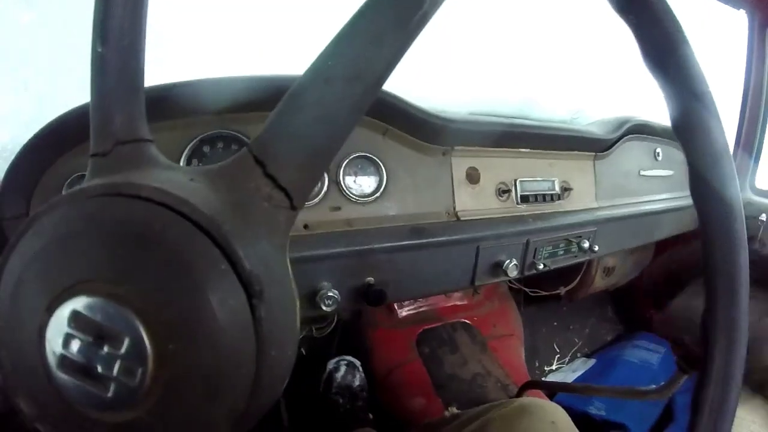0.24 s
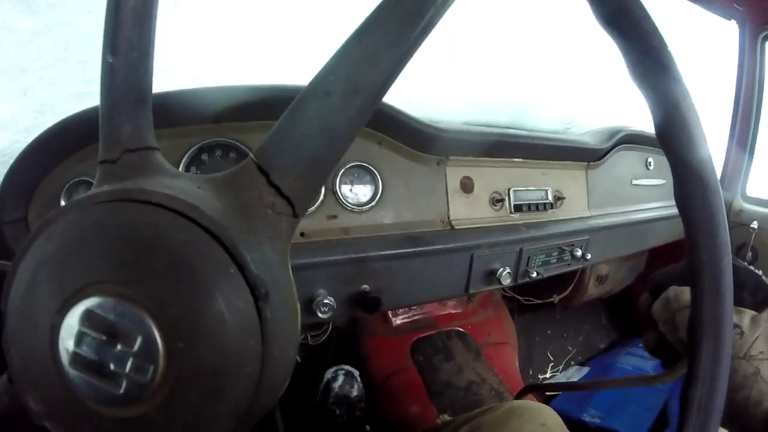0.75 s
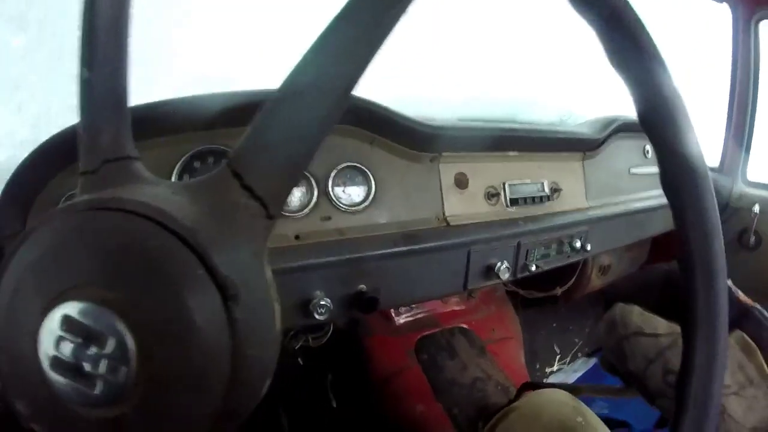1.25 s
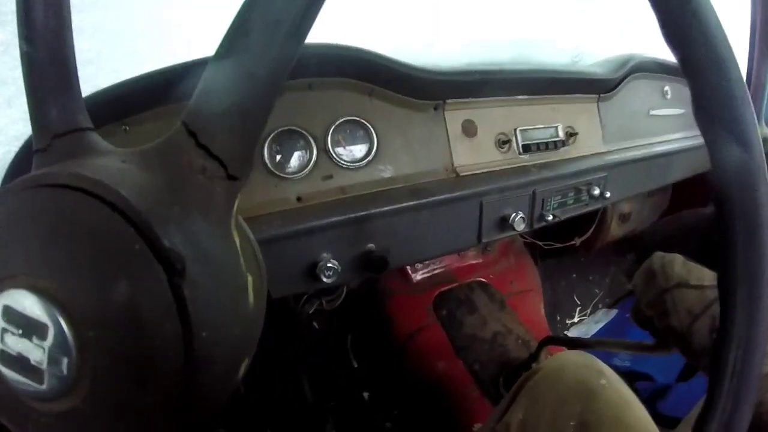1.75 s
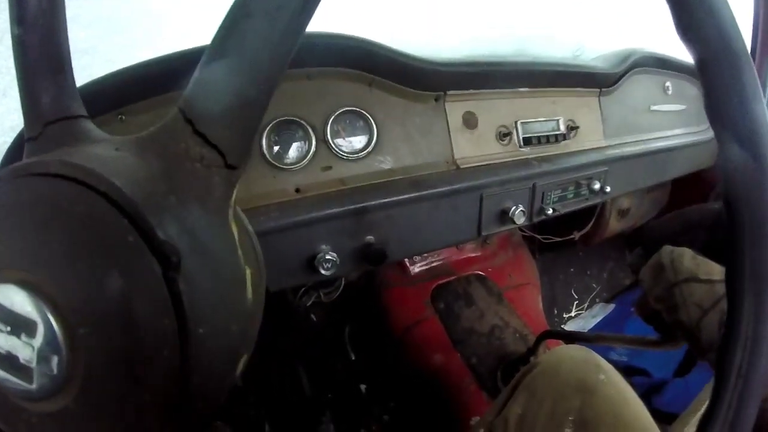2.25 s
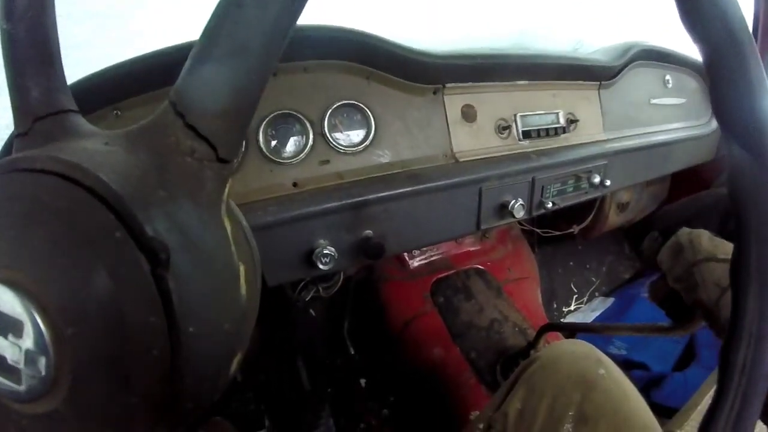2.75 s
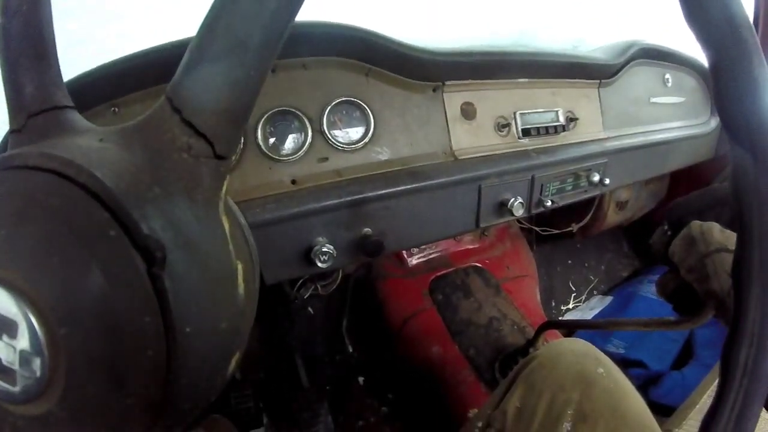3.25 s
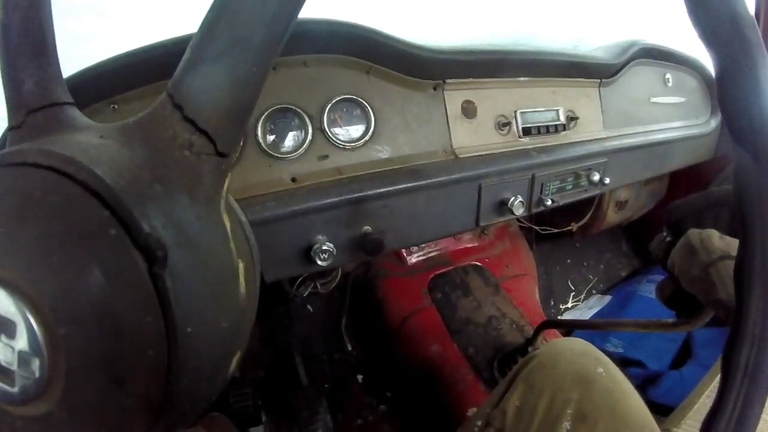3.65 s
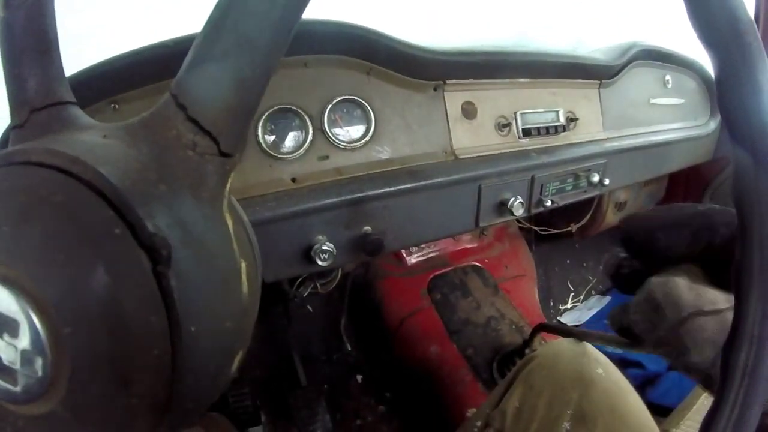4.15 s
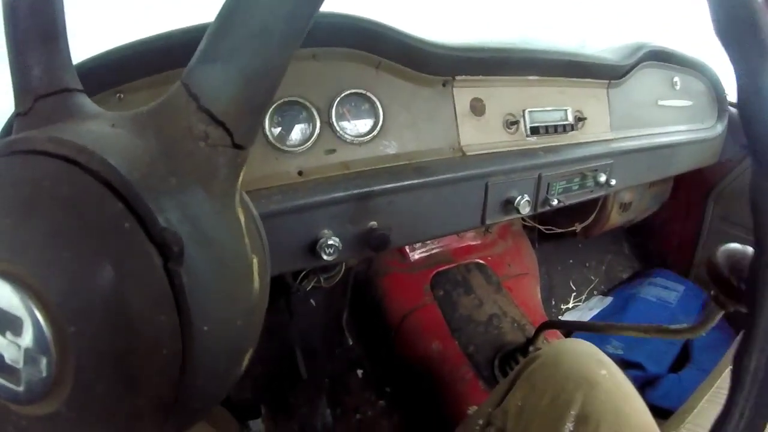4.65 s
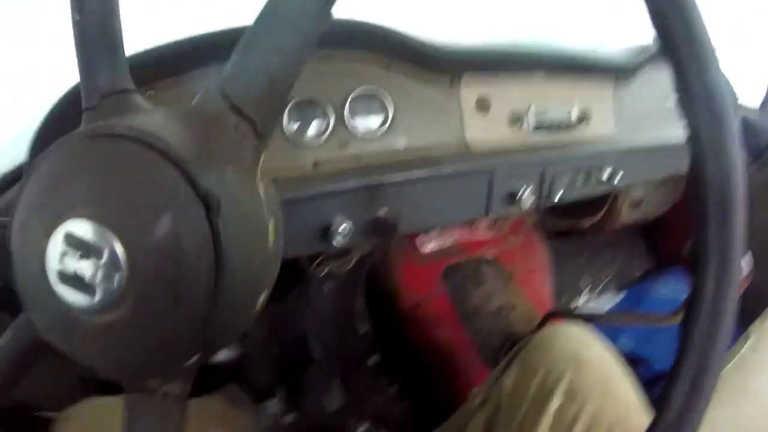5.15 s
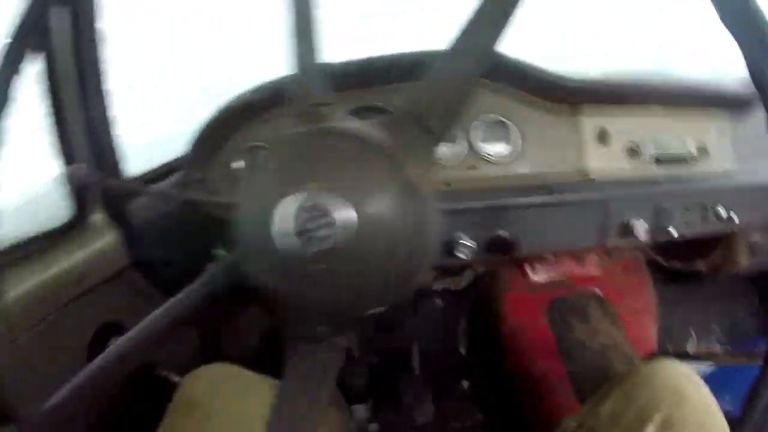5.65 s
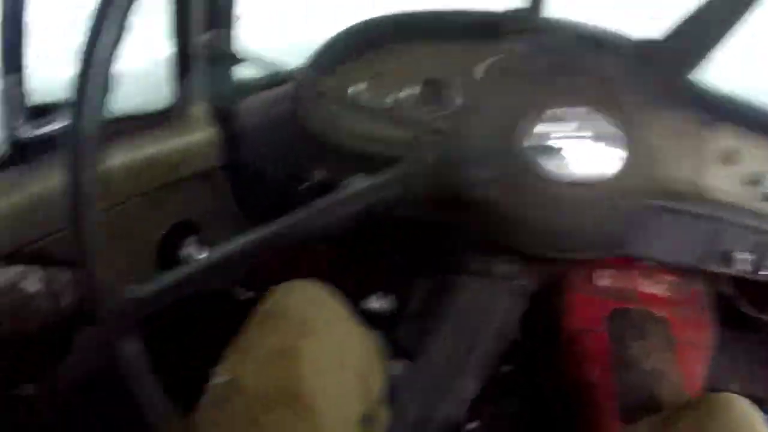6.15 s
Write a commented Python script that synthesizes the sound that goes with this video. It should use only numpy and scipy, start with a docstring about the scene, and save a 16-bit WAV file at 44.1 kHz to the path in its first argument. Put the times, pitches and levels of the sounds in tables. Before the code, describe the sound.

Heard close up in the cab of an old truck, an idling engine booms and shakes the body in a fast, lumpy rhythm. Quiet ticking sits on top, with a small clink early and dull panel knocks through the middle. After about five seconds the low shudder in the microphone lightens, and the driver's movements add a few soft thumps, short rustles and a key-like jingle over the continuing idle.

```python
"""A straight six idles unevenly, heard in the cab of an old pickup: six firings every sixth of a second. They
boom in the exhaust and shake the body; the shake comes up through a hand resting on the gear lever or steering
wheel until it lets go. Valve gear ticks over a fan-like hiss, one tappet pings, panels knock and hum. Then the
driver shifts: scrapes of cloth and trim, creaks, small metal clinks and a jingle, soft bumps."""
import sys
import numpy as np
from scipy import signal
from scipy.fft import rfft, irfft
from scipy.io import wavfile
from scipy.ndimage import uniform_filter1d

SR = 44100
rng = np.random.default_rng(int(sys.argv[2]) if len(sys.argv) > 2 else 0)


def output_pcm(signal):
    """Save a mono or channel-first signal as 16-bit PCM at the path in sys.argv[1].

    Samples are clipped to [-1, 1] before scaling.
    """
    pcm = np.clip(np.atleast_2d(signal).T, -1, 1) * 32767
    wavfile.write(sys.argv[1], SR, np.round(pcm).astype(np.int16))


N = 281799


def undb(db):
    return 10 ** (np.asarray(db) / 20)


def unit(x):
    return x / np.sqrt(np.mean(x ** 2))


def curve(table):
    """Automation: straight lines through (time, value) points."""
    return np.interp(np.arange(N) / SR, *np.transpose(table))


def ring(x, hz, width_hz):
    """Resonance with gain 1 at its centre."""
    return signal.lfilter(*signal.iirpeak(hz, hz / width_hz, SR), x)


def noise_band(hz, width_hz):
    """A resonance kept ringing by noise, rms 1."""
    return unit(ring(rng.standard_normal(N), hz, width_hz))


def coloured(spectrum, white):
    """White noise through an EQ curve, rms 1."""
    hz, db = np.transpose(spectrum)
    bin_hz = np.arange(N // 2 + 1) * SR / N
    gain = undb(np.interp(np.log(bin_hz + 1), np.log(hz), db))
    return unit(irfft(rfft(white) * gain, N))


def wander(rate_hz):
    """Smooth random drift, rms 1."""
    hold = int(SR / rate_hz)
    steps = np.repeat(rng.standard_normal(N // hold + 1), hold)
    return unit(uniform_filter1d(uniform_filter1d(steps, hold), hold)[:N])


# Idle speed, the tempo of the engine: (time [s], cycle rate [Hz])
IDLE_SPEED = [(0, 5.858), (.6, 6.004), (2, 6.003), (2.5, 6.063), (3.3, 6.047), (4, 6.091), (4.6, 6.115),
              (5.5, 6.109), (6.39, 6.149)]
def engine_cycles():
    """Running count of engine cycles."""
    return np.cumsum(curve(IDLE_SPEED)) / SR


def beats(place, scatter_db, jitter):
    """One impulse a cycle, place and jitter in cycles; a 1 s pre-roll gets resonances ringing."""
    hz = curve(IDLE_SPEED)
    cycles = np.cumsum(np.r_[np.full(SR, hz[0]), hz]) / SR - hz[0]
    whole = np.arange(np.ceil(cycles[0]), cycles[-1])
    timing, strength = rng.standard_normal((len(whole), 2)).T
    at = np.searchsorted(cycles, whole + place + jitter * timing)
    out = np.zeros(len(cycles) + 1)
    out[at] = undb(scatter_db * strength)
    return out[:-1]


# Tone of the hiss bed: (frequency [Hz], relative level [dB])
HISS_EQ = [(180, -3), (300, 1.5), (348, -7), (587, 0), (827, -6.5), (1070, -2.5), (1200, -4), (1510, -1),
           (1940, -6.5), (2910, -11), (3660, -10), (4530, -20), (9000, -28), (11900, -35.5), (15000, -76)]
# Its fader: (time [s], level [dB])
HISS_LEVEL = [(0, -53.5), (.55, -57.5), (1.5, -57), (6.39, -55.5)]
def hiss(repeat_share=.25):
    """Fan and intake noise plus dense clatter that repeats each cycle, pulsing a little with the firings."""
    cycles, loop_size = engine_cycles(), SR // 6
    clatter = rng.standard_normal(loop_size)[(cycles % 1 * loop_size).astype(int)]
    white = np.sqrt(repeat_share) * clatter + np.sqrt(1 - repeat_share) * rng.standard_normal(N)
    pulse_db = .29 * np.cos(2 * np.pi * 6 * cycles)
    return coloured(HISS_EQ, white) * undb(curve(HISS_LEVEL) + pulse_db + .33 * wander(13))


# Sheet metal resonances: (frequency [Hz], width [Hz], level [dB])
SHEET_MODES = [(400.2, 7.7, -71), (572, 35, -76.5), (679, 20, -77), (970, 22, -86), (1102, 14, -74),
               (1520, 98, -78), (2116, 32, -88.5), (2860, 28, -86), (5970, 170, -86), (6900, 280, -81)]
def sheet_hum():
    """Thin dash and floor panels hum, kept ringing by random vibration."""
    return sum(undb(db) * noise_band(hz, width) for hz, width, db in SHEET_MODES)


# Thuds: (time [s], pitch [Hz], decay to -60 dB [s], level [dB])
BUMP_HITS = [(5.182, 47.2, 0.11, -7), (5.348, 39.8, 0.054, -12), (5.102, 184, 0.08, -29.5),
             (5.179, 250, 0.061, -26), (5.27, 257, 0.15, -34.5), (5.329, 256, 0.18, -31.5),
             (5.98, 327, 0.13, -34.5), (5.987, 435, 0.085, -37), (6.336, 389, 0.1, -39)]
def bumps(rise_s=.0051):
    """Soft blows on the housing and seat: short damped swings."""
    out = 0
    for s, hz, t60, db in BUMP_HITS:
        age = np.maximum(np.arange(N) / SR - s, 0)
        envelope = (1 - np.exp(-age / rise_s)) * undb(db - 60 * (age / t60) ** .77)
        out += np.sin(2 * np.pi * hz * age) * envelope
    return out


# Creaks: (time [s], pitch [Hz], decay to -60 dB [s], level [dB])
CREAK_NOTES = [(1.35, 1362, 0.12, -46), (1.595, 1345, .04, -45), (1.596, 1030, .04, -43),
               (1.757, 1360, 0.042, -50), (6.276, 1400, 0.05, -42), (6.289, 1464, .12, -44),
               (5.100, 1390, 0.057, -40.5), (5.614, 2030, 0.036, -36), (5.615, 2400, 0.048, -44),
               (5.622, 1334, 0.066, -40), (5.643, 1390, .1, -47)]
def creaks(rise_s=.0015):
    """The trim creaks in short pitched notes: quick attack, plain decay."""
    out = 0
    for s, hz, t60, db in CREAK_NOTES:
        age = np.maximum(np.arange(N) / SR - s, 0)
        envelope = (1 - np.exp(-age / rise_s)) * undb(db - 60 * age / t60)
        out += np.sin(2 * np.pi * hz * age) * envelope
    return out


def stroke(s, length, swell_share, t60):
    """Span and envelope of a gesture: swell for a share of the length, hold, then release."""
    span = slice(int(s * SR), min(N, int((s + length + t60) * SR)))
    age = np.arange(span.stop - span.start) / SR
    swell = np.minimum(age / (swell_share * length), 1)
    return span, swell * undb(-60 * np.maximum(age - length, 0) / t60)


def rattle(modes, events, swell_share, strike_db, bright_above_hz=5000):
    """Loose metal is struck and chatters for a moment; its modes ring out by themselves."""
    chatter = rng.standard_normal(N) * undb(3.5 * wander(400))
    low_drive, bright_drive, out = np.zeros((3, N))
    for s, length, db, bright_db in events:
        span, envelope = stroke(s, length, swell_share, t60=.062)
        blow = chatter[span] * envelope
        blow[0] = undb(strike_db)
        low_drive[span] += undb(db) * blow
        bright_drive[span] += undb(db + bright_db) * blow
    for hz, width, db in modes:
        drive = bright_drive if hz > bright_above_hz else low_drive
        makeup = np.sqrt(SR / (np.pi * width))  # evens out narrow and wide modes
        out += undb(db) * makeup * ring(ring(drive, hz, width), hz, 6 * width)
    return out


# Ring of the small part: (frequency [Hz], width [Hz], gain [dB])
CLINK_MODES = [(2360, 69, -11.5), (2570, 67, -10.5), (3110, 58, -11.5), (3510, 90, -1.5), (3710, 70, -3),
               (3970, 54, -11), (4294, 62, -10.5), (5810, 160, -11.5), (6750, 150, -12), (7080, 98, -11),
               (9450, 340, -18), (10700, 400, -19), (12800, 990, -24)]
# Clinks: (time [s], length [s], level [dB], treble gain [dB])
CLINK_HITS = [(0.218, 0.018, -49.5, -5), (0.898, 0.024, -62, -3), (1.114, .012, -68, -3),
              (6.275, 0.019, -52, -3), (6.327, 0.005, -44, 3)]
def clinks():
    """A small loose metal part clinks with a hard attack."""
    return rattle(CLINK_MODES, CLINK_HITS, swell_share=.081, strike_db=21)


# Ring of the thin metal: (frequency [Hz], width [Hz], gain [dB])
JINGLE_MODES = [(7400, 400, -5), (8180, 70, -4), (8700, 100, -1), (8900, 45, -3), (9090, 35, -3),
                (9650, 300, -8), (10200, 70, -8), (10700, 46, -8), (10820, 46, -6), (11100, 62, -10),
                (11800, 80, -21)]
# Jingles: (time [s], length [s], level [dB], treble gain [dB])
JINGLE_HITS = [(5.303, 0.032, -67.5, 0), (5.925, 0.026, -65, 0), (5.958, 0.03, -49, 0)]
def jingle():
    """Thin metal, perhaps keys, shimmers with a softer attack."""
    return rattle(JINGLE_MODES, JINGLE_HITS, swell_share=.39, strike_db=7)


# Ring of the trim: (frequency [Hz], width [Hz], gain [dB])
TRIM_MODES = [(1152, 190, -9.5), (1404, 316, 0), (1782, 105, -4), (1990, 295, -4), (2360, 250, -7),
              (2684, 154, -5.5), (3340, 320, -7), (3545, 310, -3.5), (3870, 830, -4.5), (4670, 270, -12),
              (5160, 260, -9.5), (5720, 280, -7), (6780, 170, -12), (7600, 760, -16), (8500, 380, -16),
              (10300, 720, -16), (12200, 990, -11.5), (14400, 550, -13)]
# Scrapes: (time [s], length [s], dull centre [Hz], dull level [dB], bright level [dB], airy level [dB])
SCRAPE_STROKES = [(0.84, 0.13, 1400, -55, -69.5, -72), (1.582, 0.016, 1300, -52.5, -68, -72),
                  (5.098, .008, 1500, -47.5, -63, -64), (5.107, 0.044, 1700, -41.5, -56.5, -57),
                  (5.159, 0.029, 1530, -50, -65, -73), (5.184, 0.09, 1570, -47, -62.5, -76),
                  (5.269, 0.021, 1190, -41.5, -63, -66), (5.28, 0.039, 2840, -44, -72, -72),
                  (5.294, 0.041, 1330, -42.5, -54, -54), (5.488, 0.019, 1500, -60, -64.5, -66),
                  (5.611, 0.012, 1780, -49, -60, -69), (5.633, 0.027, 1400, -52, -69, -76),
                  (5.919, 0.0073, 2000, -57, -60, -53), (5.923, 0.034, 1940, -47, -57.5, -56),
                  (5.968, 0.025, 2800, -39, -55.5, -55.5), (5.975, 0.022, 1640, -40, -60, -60),
                  (5.995, 0.029, 1390, -61, -57.5, -62), (6.273, 0.014, 1500, -48, -55, -65),
                  (6.285, 0.033, 1520, -51.5, -60, -60), (6.326, 0.0085, 1510, -46.5, -45, -51),
                  (6.344, .01, 1810, -51, -57, -55)]
def scrapes(dull_top_hz=3100, bright_top_hz=8000):
    """Cloth and hands rub the trim; gritty friction rings its dull, bright and airy modes."""
    grit = rng.standard_normal(N) * undb(1.5 * wander(250))
    modes = np.array([undb(db) * unit(ring(ring(grit, hz, width), hz, 2.5 * width))
                      for hz, width, db in TRIM_MODES])
    hz, out = np.transpose(TRIM_MODES)[0], np.zeros(N)
    for s, length, dull_hz, dull_db, bright_db, airy_db in SCRAPE_STROKES:
        bell_db = dull_db - 34 * np.log2(hz / dull_hz) ** 2  # 34 dB down an octave off centre
        mode_db = np.select([hz < dull_top_hz, hz < bright_top_hz], [bell_db, bright_db], airy_db)
        span, envelope = stroke(s, length, swell_share=.37, t60=.095)
        out[span] += undb(mode_db) @ modes[:, span] * envelope
    return out


# Tone of the rumble: (frequency [Hz], relative level [dB])
RUMBLE_EQ = [(6, -17), (18, -10), (30, -12), (42, -13), (68, -11), (82, -9), (96, -24), (125, -17),
             (160, -17), (190, -17), (245, -20), (290, -30), (600, -60)]
# Its fader: (time [s], level [dB])
RUMBLE_LEVEL = [(0, -50), (.8, -48.5), (1.3, -46), (2, -47.5), (4.74, -47.5), (4.82, -52), (5.1, -49),
                (5.25, -40), (5.45, -51), (6.39, -51)]
def hand_rumble():
    """Loose, wavering rumble in the hand."""
    return coloured(RUMBLE_EQ, rng.standard_normal(N)) * undb(curve(RUMBLE_LEVEL) + .83 * wander(6.8))


# Knocks: (time [s], peak level [dB], pitch [Hz])
PANEL_KNOCKS = [(1.527, -43.5, 252), (1.691, -46.5, 230), (1.951, -44, 226), (2.026, -41, 237),
                (2.194, -43, 245), (2.271, -48, 230), (2.364, -44.5, 232), (2.452, -41.5, 238),
                (2.53, -42, 225), (2.694, -39, 225), (2.858, -43.5, 250), (2.933, -50, 252),
                (3.025, -37.5, 242), (3.19, -38, 236), (3.364, -45, 233), (3.506, -40, 247),
                (3.694, -43.5, 243), (4.015, -46, 235), (4.19, -45.5, 234), (4.344, -42, 240),
                (4.509, -44.5, 220), (4.67, -40, 220)]
def loose_panel(rise_s=.0015, t60=.11):
    """A shaken panel knocks, rings briefly and hums on between knocks."""
    knocks = np.zeros(N)
    age = np.arange(SR // 4) / SR
    for s, db, hz in PANEL_KNOCKS:
        swing = np.sin(2 * np.pi * hz * age) * (1 - np.exp(-age / rise_s)) * undb(-60 * age / t60)
        start = int(s * SR)
        knocks[start:start + len(age)] += undb(db) * swing / swing.max()
    mean_swing = uniform_filter1d(np.abs(knocks), size=SR // 3)
    return knocks + undb(-1) * mean_swing * noise_band(238, width_hz=36)


# Ring of the tappet: (frequency [Hz], ring time [s], rms level [dB])
TAPPET_MODES = [(5950, .035, -91), (6800, .035, -90), (7100, .035, -90), (8000, .035, -91),
                (8250, .035, -92), (8700, .035, -92), (9050, .04, -89), (10000, .03, -98)]
def tappet_ping():
    """One tappet pings once a cycle; each mode is hit with its own strength and timing."""
    out = 0
    for hz, ring_s, db in TAPPET_MODES:
        blows = beats(place=.42, scatter_db=3.2, jitter=.003)
        out += undb(db) * unit(ring(ring(blows, hz, 1.5 / ring_s), hz, 400)[-N:])
    return out


# Treble ticks: (place in the cycle [0-1], centre [Hz], width [Hz], decay to -60 dB [s], level [dB])
TICK_BURSTS = [(0.2, 8100, 2500, 0.071, -70.5), (.63, 3780, 540, 0.17, -67), (0.6, 2300, 8500, 0.13, -70.5),
               (0.94, 3550, 320, 0.4, -71.5), (.1, 2100, 6800, 0.23, -69.5)]
def valve_ticks():
    """The valve gear ticks: bursts of noise that die away, each once a cycle."""
    out = 0
    for place, hz, width, t60, db in TICK_BURSTS:
        triggers = beats(place, scatter_db=2, jitter=.0072)
        envelope = signal.lfilter([1], [1, -undb(-60 / (t60 * SR))], triggers)[-N:]
        out += undb(db) * envelope * unit(ring(noise_band(hz, width), hz, 2 * width))
    return out


# Tap pattern: (place in the cycle [0-1], strongest pitch [Hz], accent [dB])
VALVE_TAPS = [(.09, 610, 0.5), (.11, 1480, -2), (.252, 590, 6), (.26, 1030, -3), (.41, 500, 4.5),
              (.42, 990, -1), (.43, 1360, 5.5), (.525, 1350, 2.5), (.51, 970, -6), (.55, 385, -3.5),
              (.65, 1740, 4), (.68, 2300, 1), (.785, 1560, 3.5), (.81, 1110, 0), (0.892, 556, -5)]
# Ring of the block and covers: (frequency [Hz], ring time [s], rms level [dB])
BLOCK_MODES = [(393.4, 0.18, -70), (486, 0.042, -70), (594.3, 0.18, -67.5), (675, 0.17, -75),
               (977, 0.034, -70.5), (1082, 0.14, -72.5), (1368, 0.12, -69), (1441, 0.018, -73),
               (1540, 0.13, -72.5), (1696, 0.11, -73), (2090, 0.06, -84), (2303, .14, -81),
               (2464, 0.26, -79.5)]
def valve_taps(octave_fall_db=100):
    """Valve gear and pushrods strike the block and covers; each tap favours modes near its own pitch."""
    taps = [beats(place, scatter_db=2.1, jitter=.004) for place, _, _ in VALVE_TAPS]
    out = 0
    for hz, ring_s, db in BLOCK_MODES:
        blows = 0
        for tap, (_, tap_hz, tap_db) in zip(taps, VALVE_TAPS):
            strength = undb(tap_db - octave_fall_db * np.log2(hz / tap_hz) ** 2)
            blows += strength * rng.choice([-1, 1]) * tap
        ringing = ring(blows, hz, 2.37 / ring_s)
        out += undb(db) * unit(ring(ringing, hz, 140)[-N:])  # the second resonance softens the attack
    return out


def firings(pattern, modes, scatter_db, jitter):
    """Six cylinders push a set of low resonances, rms 1."""
    push = sum(undb(db) * beats(place, scatter_db, jitter) for place, db in pattern)
    return unit(sum(sign * undb(db) * ring(push, hz, width) for hz, width, db, sign in modes)[-N:])


def drone(orders):
    """Tones at multiples of the cycle rate, each wavering in level."""
    cycles = engine_cycles()
    return sum(undb(db + 2 * wander(3)) * np.sin(2 * np.pi * (order * cycles + rng.random()))
               for order, db in orders)


# Exhaust rhythm, three strong and three weak: (place in the cycle [0-1], accent [dB])
EXHAUST_PUFFS = [(.046, -1.4), (.217, -3.3), (.384, 0), (.56, -13.3), (.727, -10.2), (.88, -11.4)]
# Pipe and cab booms: (frequency [Hz], width [Hz], gain [dB], polarity [+/-1])
BOOM_MODES = [(30.3, 6, 3.5, -1), (75.7, 6, -13, -1), (108.6, 4.5, -2, 1)]
# Their fader: (time [s], level [dB])
BOOM_LEVEL = [(0, -33.5), (.8, -42), (2, -40.5), (4, -45), (6.39, -40)]
# Pipe drone: (multiple of the cycle rate, level [dB])
PIPE_TONES = [(24, -59), (30, -59), (32, -62)]
def exhaust():
    """Exhaust puffs boom in pipe and cab; the floor and firewall keep their sharp edges out."""
    booms = firings(EXHAUST_PUFFS, BOOM_MODES, scatter_db=.25, jitter=.0005)
    muffled = signal.sosfilt(signal.butter(3, 280, fs=SR, output="sos"), booms)
    return undb(curve(BOOM_LEVEL)) * muffled + drone(PIPE_TONES)


# Six uneven firings as the body feels them: (place in the cycle [0-1], accent [dB])
FIRING_JOLTS = [(.104, -5.3), (.266, -4.1), (.464, -.8), (.591, 0), (.772, -6.3), (.941, -1.7)]
# The body on its mounts: (frequency [Hz], width [Hz], gain [dB], polarity [+/-1])
BODY_MODES = [(27.6, 6.8, 0, 1), (31.1, 6, -.5, -1), (82.6, 6, -27.6, -1)]
# Drone within the shake: (multiple of the cycle rate, relative level [dB])
SHAKE_TONES = [(8, -21), (9, -21), (11, -22), (13, -29), (14, -30), (19, -31), (22, -36)]
# Firmness of the grip, the fader of the shake: (time [s], level [dB])
GRIP_LEVEL = [(0, -28), (.4, -27.5), (1.2, -29), (1.6, -33), (1.85, -30), (3.5, -28.5), (4.4, -29),
              (4.74, -31)]
def engine_shake(let_go_s=4.74, fade_db_per_s=120, drop_db=17):
    """Firings rock the body; the shake comes through a gloved hand and drops away as it lets go."""
    jolts = firings(FIRING_JOLTS, BODY_MODES, scatter_db=.15, jitter=.0004)
    glove = signal.butter(1, 120, fs=SR)
    softened = signal.lfilter(*glove, signal.lfilter(*glove, jolts))
    shiver = undb(-24) * noise_band(83, width_hz=7)
    let_go_db = np.clip(fade_db_per_s * (np.arange(N) / SR - let_go_s), 0, drop_db)
    return (softened + drone(SHAKE_TONES) + shiver) * undb(curve(GRIP_LEVEL) - let_go_db)


def scene():
    """Mono mix of the engine, the cab's noise bed and the driver's movements."""
    engine = engine_shake() + exhaust() + valve_taps() + valve_ticks() + tappet_ping()
    bed = hiss() + sheet_hum() + hand_rumble() + loose_panel()
    driver = bumps() + creaks() + clinks() + jingle() + scrapes()
    return (engine + bed + driver)[None]


def record(dry, droop_hz=11730, cutoff_hz=15100):
    """The microphone droops in the top octave, then cuts off."""
    dull = signal.sosfilt(signal.butter(4, droop_hz, fs=SR, output="sos"), dry)
    return signal.sosfilt(signal.ellip(8, .2, 70, cutoff_hz, fs=SR, output="sos"), dull)


dry = scene()
out = record(dry)
output_pcm(out)
```